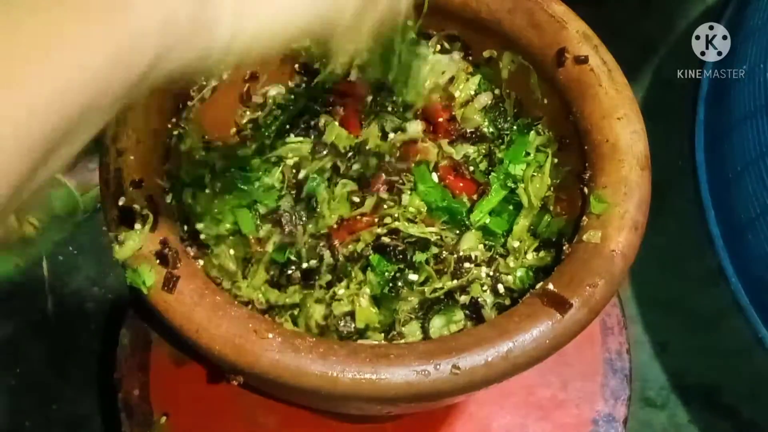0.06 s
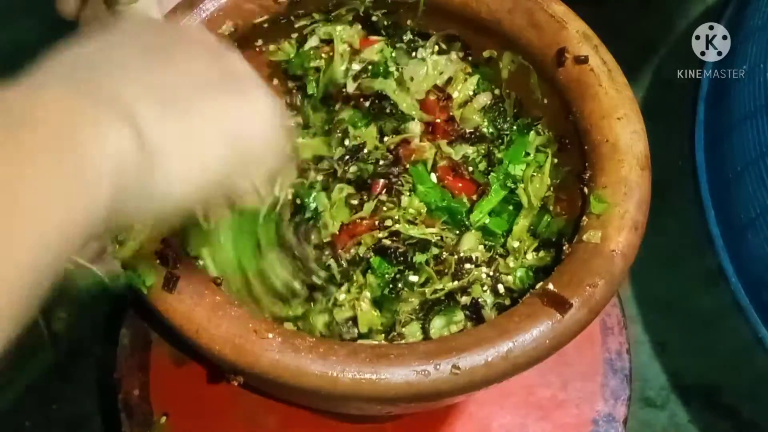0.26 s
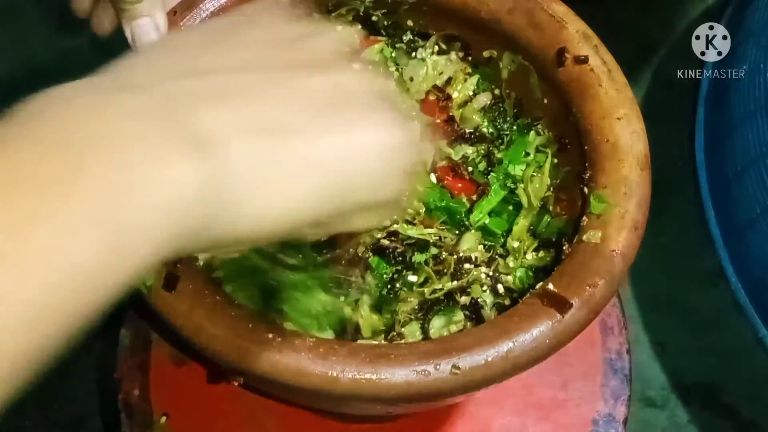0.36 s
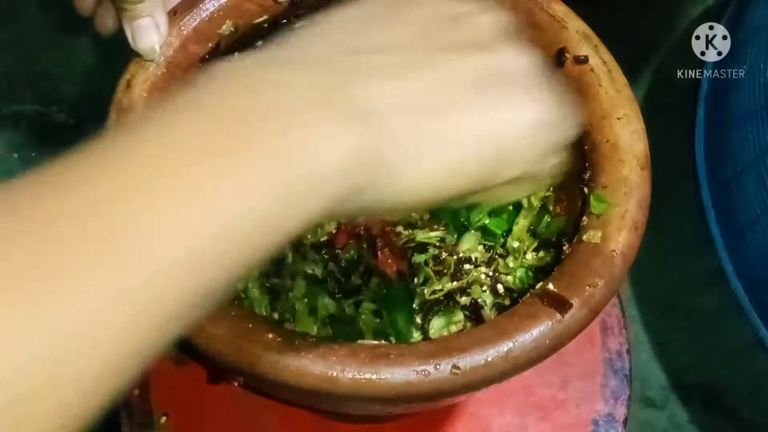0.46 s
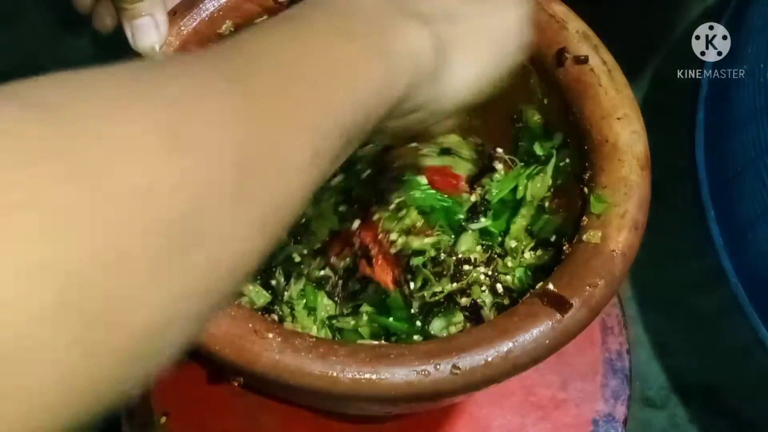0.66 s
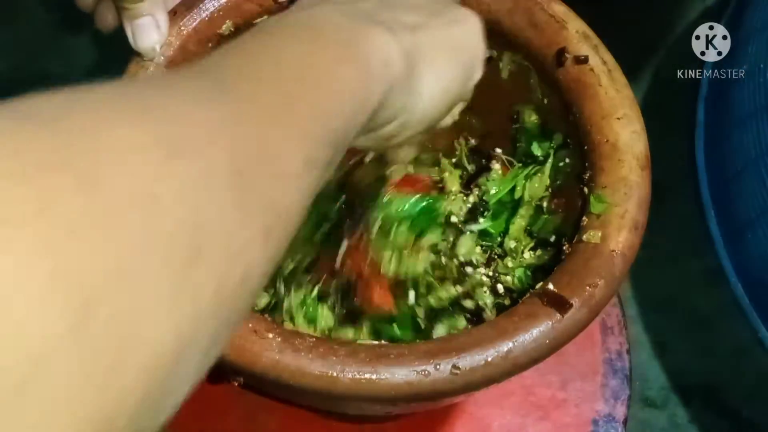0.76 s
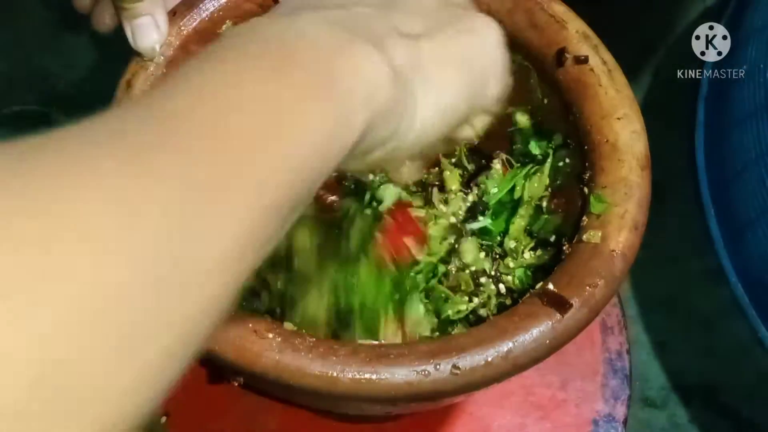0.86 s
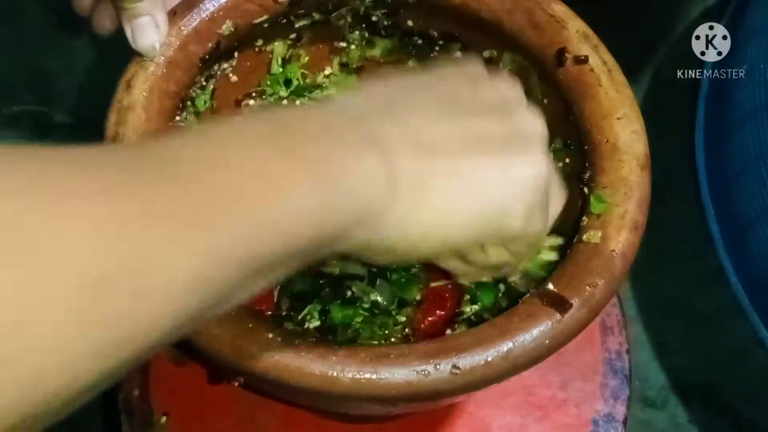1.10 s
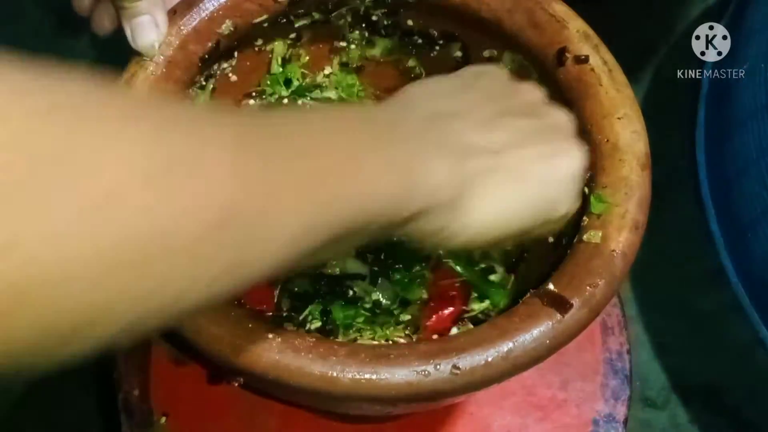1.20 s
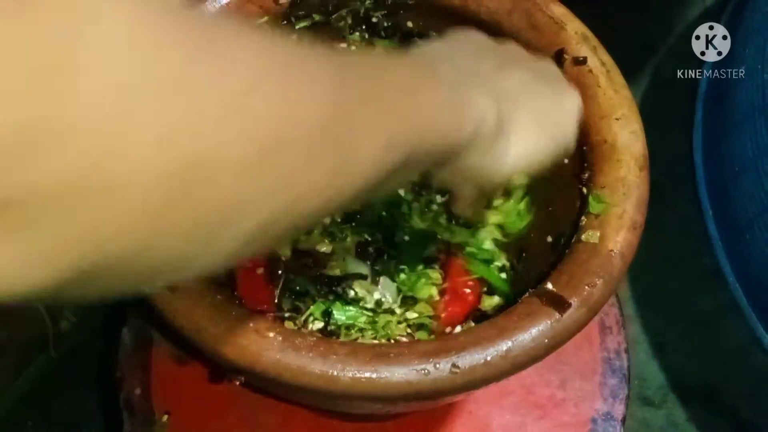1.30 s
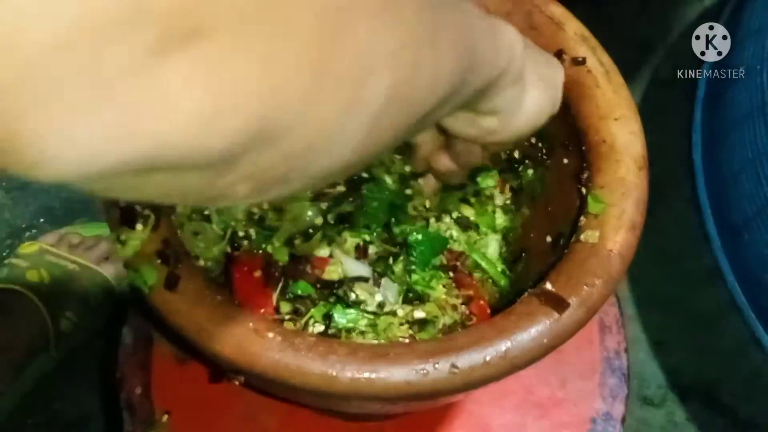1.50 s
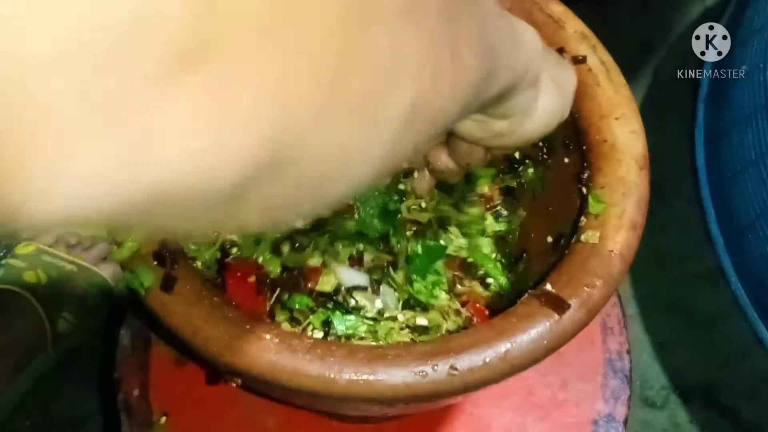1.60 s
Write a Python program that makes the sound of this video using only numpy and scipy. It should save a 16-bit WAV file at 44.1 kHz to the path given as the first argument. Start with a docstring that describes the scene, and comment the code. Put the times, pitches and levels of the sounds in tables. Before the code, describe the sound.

A metal spoon mixes softly rustling wet leaves in a clay mortar, close by in a small kitchen. At 0.2 seconds it knocks loudly, rings and scrapes over gritty clay. A second stroke at 0.7 clinks and gently rocks the mortar. After a light rub, a third at 1.2 sweeps round with a sinking squeal. Faint hoots come around 1.5, and a distant cricket chirps throughout.

```python
"""A metal spoon tosses a wet herb salad in a clay mortar, close by, in a small kitchen.
Leaves rustle; at 0.2 s the spoon knocks on the wall, rings and scrapes over the gritty clay.
A second stroke at 0.65 s rocks the mortar on its stand. After a light rub, a third at 1.2 s sweeps
round the wall with a sinking squeal. Each stroke dulls towards its end. Late on, something hoots
faintly; a distant cricket chirps throughout."""
import sys
import numpy as np
from scipy import signal
from scipy.fft import rfft, irfft, next_fast_len
from scipy.io import wavfile
from scipy.ndimage import map_coordinates

SR = 44100
rng = np.random.default_rng(int(sys.argv[2]) if len(sys.argv) > 2 else 0)


def file_out(sig):
    """Save sig as 16-bit WAV at sys.argv[1]."""
    # one column per channel
    cols = np.atleast_2d(sig).T
    # limit, then scale
    lim = np.clip(cols, -1, 1)
    pcm = np.round(lim * 32767).astype(np.int16)
    wavfile.write(sys.argv[1], SR, pcm)


N = 72765

# The three strokes. Each row: time in seconds, then rasp, brightness, hollow and hiss in dB.
STIR_STROKE = [(0.213, -26, -5, -52, -49), (0.25, -40.5, 5, -61, -45), (0.286, -38.5, -17, -61, -58),
               (0.289, -23, 27, -37.5, -32), (0.31, -28.5, 13, -37.5, -42), (0.335, -25, -0.5, -32.5, -37),
               (0.36, -24.5, -14, -57, -46), (0.381, -29.5, 6.5, -50.5, -38.5), (0.389, -62, -4, -43, -65)]
SCOOP_STROKE = [(0.654, -61, -5, -77, -59), (0.684, -42, 7, -57, -52), (0.69, -39.5, 6, -39.5, -38.5),
                (0.714, -38.5, 6, -43.5, -40.5), (0.74, -38, 6.5, -53.5, -44.5),
                (0.772, -36.5, -3, -45, -46), (0.783, -43.5, -12, -47.5, -81)]
SWEEP_STROKE = [(1.182, -80, -2, -76, -61.5), (1.24, -59, -5, -76, -64), (1.2446, -33.5, 30, -44.5, -41),
                (1.273, -36.5, -1, -44.5, -41.5), (1.302, -37.5, -3, -43.5, -49),
                (1.322, -40.5, -2, -46, -39), (1.362, -41.5, -12, -50, -55), (1.382, -39, -22, -44, -56.5),
                (1.42, -48, -7, -50, -64), (1.473, -42.5, -22, -48, -59), (1.497, -41.5, -21, -49, -64),
                (1.506, -60.5, -9, -59, -81), (1.59, -53.5, -18, -64.5, -109), (1.65, -61, -4, -70, -77)]
# Spoon on the wall. Each row: start in seconds, then clack, thud, tick and ring in dB.
KNOCKS = [(0.001, -46.5, -50, -49, -44), (0.2111, -26, -26.5, -16.5, -22.5), (0.2829, -32, -63, -33, -25),
          (0.2877, -15, -23.5, -27, -27), (0.304, -19, -36.5, -47, -24), (0.3693, -27, -70, -56, -34.5),
          (0.6582, -43, -72, -46.5, -64), (0.6862, -26.5, -37, -37, -54), (0.738, -38, -46.5, -59, -42.5),
          (1.2421, -38.5, -57.5, -38, -72), (1.2632, -31, -63, -27.5, -70), (1.373, -39, -62, -42, -68),
          (1.3786, -37, -58, -44, -72)]
# Spoon modes. Each row: pitch in Hz, level in dB, damped and lingering t60 in seconds,
# lingering part in relative dB.
SPOON_MODES = [(967.5, -5, 0.079, 0.34, 1.5), (2467, 0.5, 0.07, 0.31, -7.5), (3290, -14.5, 0.069, 0.36, -3),
               (4350, -14, 0.053, 0.24, -2), (5770, -21, 0.041, 0.16, -11), (9740, -16, 0.033, .3, -1)]
# Resonances of spoon and wall. Each row: centre in Hz, width in Hz, relative gain in dB.
WALL_MODES = [(987, 11, -2), (2363, 21, -8), (2458, 16, -6.5), (2866, 32, -9.5), (3265, 12, -10),
              (3272, 25.5, 0), (3260, 28, -11), (3800, 25, -18), (3996, 13, -9), (4237, 23, -2.5)]
# Rim clinks, pushes on the mortar, seeds and stalks snapping. Each row: start in seconds, level in dB.
CLINKS = [(0.2872, -31.5), (0.6863, -32.5)]
PUSHES = [(0.686, -53.5), (1.26, -64), (1.43, -62.5)]
SNAPS = [(0.0942, -51), (0.6413, -53), (1.0111, -57.5), (1.1837, -64), (1.2175, -54.5)]
# Modes of the spoon's rim and the stand. Each row: pitch in Hz, gain in dB, t60 in seconds.
RIM_MODES = [(2480, -4, 0.085), (3224, -4, 0.27), (3720, -10, 0.1), (4250, -1, 0.15), (4302, -0.5, 0.13),
             (4500, -5, 0.071), (4760, -9.5, 0.041)]
STAND_MODES = [(81.4, 3, 0.22), (235, 5.5, 0.19)]
# Contact resonance in the sweep. Each row: time in seconds, pitch in Hz, level in dB.
SQUEAL_PATH = [(1.245, 3800, -34), (1.28, 3650, -46), (1.34, 3510, -42.5), (1.366, 3350, -47),
               (1.38, 2900, -38), (1.401, 2790, -56.5), (1.449, 2766, -56), (1.493, 2480, -50.5),
               (1.51, 2230, -58)]
# Light rub. Each row: start and length in seconds, pitch and width in Hz, level in dB.
RUB_BANDS = [(0.963, .15, 3400, 141, -68.5), (0.96, 0.2, 486.5, 70.3, -70)]
# Leaves shifting. Each row: time in seconds, level in dB.
LEAF_LEVELS = [(0, -51), (0.07, -64), (0.105, -56.5), (0.19, -62.5), (0.55, -68.5), (0.9, -67), (1.04, -69),
               (1.16, -68), (1.22, -63.5), (1.65, -67)]
# Distant hoots. Each row: start and length in seconds, pitch in Hz, level in dB.
HOOTS = [(1.13, 0.16, 770, -68.5), (1.5, .07, 808, -51.5), (1.568, 0.081, 816, -48.5)]
# Noise spectra. Each row: frequency in Hz, relative density in dB.
DULL_RASP = [(200, -44.5), (800, -13), (1100, -9.5), (1320, -16.5), (1650, -8), (2100, -6.5), (2600, -4),
             (3400, -11.5), (4300, -20.5), (4900, -29), (9000, -37)]
BRIGHT_CLAY = [(800, -26.5), (2000, -13.5), (2700, -0.5), (3400, 3), (3900, 0.5), (4400, 0), (4850, -16),
               (5900, -12.5), (7000, -28), (12000, -44)]
BOWL_HOLLOW = [(40, -75), (75, -23.5), (200, -22.5), (340, -20), (440, -6.5), (520, 2), (600, -1.5),
               (740, -11.5), (1100, -18), (1500, -35.5), (4000, -55)]
WET_HISS = [(3500, -25), (5300, -20), (6000, -4.5), (6850, -4), (7400, -3), (8500, -9.5), (9300, 0),
            (9800, 8.5), (10350, -3), (11000, -5), (11800, -14), (12500, -13.5), (13500, -22), (15000, -15),
            (16000, -12.5)]
BOWL_THUD = [(35, -45), (80, -26), (150, -20.5), (220, -7), (300, -9), (400, 0.5), (510, 2.5), (720, -6),
             (1130, 1), (1500, -36), (4000, -54)]
METAL_TICK = [(2000, -24), (5000, -3), (6600, -15), (7450, 5), (8300, -9.5), (9600, 1), (10200, -5),
              (11100, 5.5), (12200, -11.5), (13400, -19), (15000, -5.5), (16000, -19)]
LEAF_RUSTLE = [(200, -8.5), (500, 0.5), (1000, -1.5), (1500, -4.5), (2400, 2.5), (3400, 0), (5000, -14),
               (7000, -15), (10000, -7.5), (12500, -21.5), (16000, -16)]
NOISE_FLOOR = [(25, -22), (55, -10.5), (100, 2.5), (200, -2.5), (330, -5), (480, -4), (800, -12.5),
               (1600, -14.5), (3300, -8.5), (5200, -16.5), (6100, -13.5), (6900, -14), (10000, -23),
               (15000, -44)]
# Kitchen decay. Each row: frequency in Hz, t60 in seconds.
ROOM_DECAY = [(150, 0.76), (420, 0.42), (700, 0.33), (1600, 0.3), (3000, 0.4), (10000, 0.24), (16000, 0.21)]

TIME_S = np.arange(N) / SR


def scrapes():
    """The spoon's edge judders over clay grit: a rasp, the bowl's hollow and a wet hiss."""
    drives = np.zeros((4, N))
    for stroke in (STIR_STROKE, SCOOP_STROKE, SWEEP_STROKE):
        times_s, *columns_db = np.transpose(stroke)
        rasp, tilt, hollow, hiss = [amp(np.interp(TIME_S, times_s, db)) for db in columns_db]
        dull = rasp / np.hypot(1, tilt)
        touching = (TIME_S >= times_s[0]) & (TIME_S <= times_s[-1])
        drives += np.array([dull, dull * tilt, hollow, hiss]) * touching
    judder = unit(amp(2 * wobble(260)))
    dull, bright, hollow, hiss = [
        coloured(drive * judder * grains(per_s=5500, spread_db=3.5), spectrum)
        for drive, spectrum in zip(drives, (DULL_RASP, BRIGHT_CLAY, BOWL_HOLLOW, WET_HISS))]
    return wall(dull + bright) + hollow + wandering_contact(hiss)


def wall(x):
    """Adds the narrow resonances of spoon and clay wall."""
    def response(hz):
        peaks = sum(amp(db) * 1j * hz * width_hz / (centre_hz ** 2 - hz ** 2 + 1j * hz * width_hz)
                    for centre_hz, width_hz, db in WALL_MODES)
        return 0.63 * (1 + 2 * peaks)
    return filtered(x, response)


def wandering_contact(x, spread_db=4, patch_hz=450, patch_s=0.03):
    """The point of contact wanders, so treble resonances come and go."""
    hz, t, spectra = signal.stft(x, SR, nperseg=256)
    grid = np.meshgrid(hz / patch_hz, t / patch_s, indexing="ij")
    patches = map_coordinates(rng.standard_normal((256, 256)), grid)
    return signal.istft(spectra * unit(amp(spread_db * patches)), SR, nperseg=256)[1][:N]


def knocks():
    """Each contact gives a clack of clay, a thud of the bowl and a metal tick."""
    starts_s, clack_db, thud_db, tick_db, _ = np.transpose(KNOCKS)
    clack = wall(coloured(bursts(starts_s, clack_db, t60_s=0.037), BRIGHT_CLAY))
    thud = coloured(bursts(starts_s, thud_db, t60_s=0.054), BOWL_THUD)
    tick = coloured(bursts(starts_s, tick_db, t60_s=0.015), METAL_TICK)
    return clack + thud + tick


def spoon_ring(rise_s=0.0016, waver_rad=0.33):
    """Each knock tops up the ring: one part damped by the wall, one lingering."""
    out = np.zeros(N)
    ages_s = np.array([since(row[0]) for row in KNOCKS])
    blows = amp([row[-1] for row in KNOCKS])[:, None] * (1 - np.exp(-ages_s / rise_s))
    for hz, db, damped_s, linger_s, linger_db in SPOON_MODES:
        fades = decay(ages_s, damped_s) + amp(linger_db) * decay(ages_s, linger_s)
        envelope = np.linalg.norm(blows * fades, axis=0)  # blows add in power
        out += amp(db) * envelope * np.sin(2 * np.pi * hz * TIME_S + waver_rad * wobble(70))
    return out


def struck(hits, modes, rise_s):
    """Each hit sets off damped modes."""
    out = np.zeros(N)
    for start_s, hit_db in hits:
        t = since(start_s)
        onset = amp(hit_db) * (1 - np.exp(-t / rise_s))
        for hz, db, t60_s in modes:
            out += amp(db) * onset * decay(t, t60_s) * np.sin(2 * np.pi * hz * t)
    return out


def squeal():
    """Friction drives a contact resonance that sinks as the spoon sweeps round the wall."""
    times_s, hz, db = np.transpose(SQUEAL_PATH)
    touching = (TIME_S > times_s[0]) & (TIME_S < times_s[-1])
    note = narrow_noise(np.interp(TIME_S, times_s, hz), width_hz=520)
    return amp(np.interp(TIME_S, times_s, db)) * touching * note


def rub():
    """Light friction swells and fades in two narrow resonances."""
    return sum(amp(db) * arch(start_s, length_s) * narrow_noise(hz, width_hz)
               for start_s, length_s, hz, width_hz, db in RUB_BANDS)


def leaves():
    """Wet leaves crackle softly; seeds and stalks snap."""
    level_db = np.interp(TIME_S, *np.transpose(LEAF_LEVELS))
    crackle = amp(level_db) * grains(per_s=1500, spread_db=3)
    snaps = bursts(*np.transpose(SNAPS), t60_s=0.032)
    return coloured(crackle + snaps, LEAF_RUSTLE)


def kitchen(x, delay_s=0.008):
    """The room's tail; each frequency dies at its own rate."""
    hz, t, spectra = signal.stft(rng.standard_normal(SR // 2), SR, nperseg=256)
    tail = signal.istft(spectra * decay(t, along(ROOM_DECAY, hz)[:, None]), SR, nperseg=256)[1]
    impulse = np.pad(tail / np.linalg.norm(tail), (int(delay_s * SR), 0))
    return signal.fftconvolve(x, impulse)[:N]


def hoot(waver_rad=0.41):
    """A faint, nearly pure tone in short swells."""
    out = np.zeros(N)
    for start_s, length_s, hz, db in HOOTS:
        tone = np.sin(2 * np.pi * hz * since(start_s) + waver_rad * wobble(59.95))
        out += amp(db) * np.sqrt(arch(start_s, length_s)) * tone
    return out


def cricket(period_s=0.1338, peak_at_s=0.841):
    """A distant cricket: even pulses of a high, narrow band."""
    chirps = np.cos(np.pi * (TIME_S - peak_at_s) / period_s) ** 2
    return amp(-66) * chirps * narrow_noise(6093, width_hz=570)


def amp(db):
    """Decibels to gain."""
    return 10 ** (np.asarray(db) / 20)


def unit(x):
    """x at rms 1."""
    return x / np.sqrt(np.mean(x ** 2) + 1e-20)


def along(points, hz):
    """Interpolates on a log frequency axis."""
    knots_hz, values = np.transpose(points)
    return np.interp(np.log(hz + 1), np.log(knots_hz + 1), values)


def since(start_s):
    """Seconds since the start, zero before."""
    return np.maximum(TIME_S - start_s, 0)


def arch(start_s, length_s):
    """Half-sine envelope."""
    return np.abs(np.sin(np.pi * np.minimum(since(start_s) / length_s, 1)))


def decay(t, t60_s):
    """Gain falling 60 dB in t60_s."""
    return np.exp(-np.minimum(np.log(1000) * t / t60_s, 30))


def filtered(x, response):
    """x through a complex frequency response."""
    size = 2 * next_fast_len(N)
    return irfft(rfft(x, size) * response(np.fft.rfftfreq(size, 1 / SR)), size)[:N]


def coloured(x, spectrum):
    """x through a minimum-phase filter of unit power."""
    def response(hz):
        gain = unit(amp(along(spectrum, hz)))
        cepstrum = irfft(np.log(gain))
        half = len(cepstrum) // 2
        cepstrum[1:half] *= 2
        cepstrum[half + 1:] = 0
        return np.exp(rfft(cepstrum))
    return filtered(x, response)


def wobble(knots_per_s):
    """Smooth random curve."""
    return map_coordinates(rng.standard_normal(N), [TIME_S * knots_per_s])


def grains(per_s, spread_db):
    """Tiny random impacts of uneven size, rms 1."""
    impacts = (rng.random(N) < per_s / SR) * rng.choice([-1, 1], N)
    return unit(impacts * amp(spread_db * rng.standard_normal(N)))


def bursts(starts_s, levels_db, t60_s):
    """Dying noise from each start."""
    return sum(amp(db) * (TIME_S > start_s) * decay(since(start_s), t60_s) * rng.standard_normal(N)
               for start_s, db in zip(starts_s, levels_db))


def narrow_noise(hz, width_hz):
    """Noise round a steady or moving pitch, rms 1."""
    phase = 2 * np.pi * np.cumsum(hz * np.ones(N)) / SR
    return unit(wobble(width_hz) * np.sin(phase) + wobble(width_hz) * np.cos(phase))


def scene():
    """Spoon, mortar and leaves in the kitchen, over a quiet background."""
    clinks = struck(CLINKS, RIM_MODES, rise_s=0.00017)
    rocking = struck(PUSHES, STAND_MODES, rise_s=0.0087)
    near = scrapes() + squeal() + rub() + knocks() + clinks + leaves()
    background = amp(-66.5) * coloured(rng.standard_normal(N), NOISE_FLOOR) + cricket() + hoot()
    return (near + amp(-11) * kitchen(near) + spoon_ring() + rocking + background)[None]


def record(dry):
    """Steep low-pass."""
    cutoff_hz = 15600
    return filtered(dry[0], lambda hz: 1 / np.sqrt(1 + (hz / cutoff_hz) ** 300))[None]


dry = scene()
out = record(dry)
file_out(out)
```